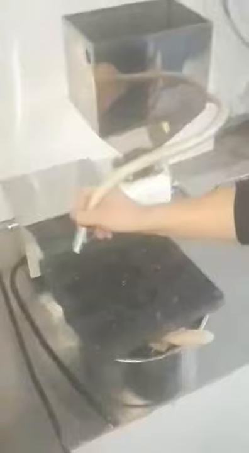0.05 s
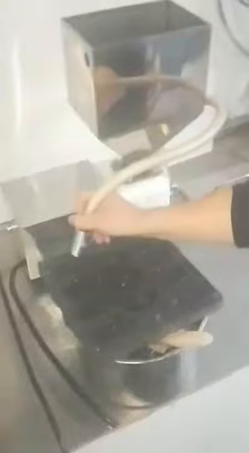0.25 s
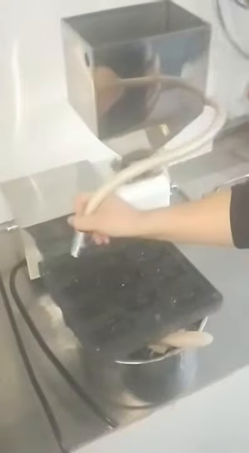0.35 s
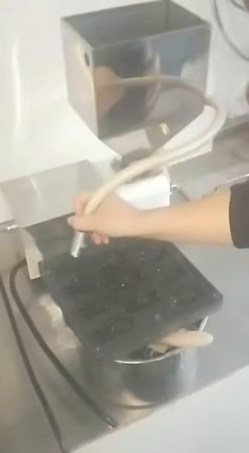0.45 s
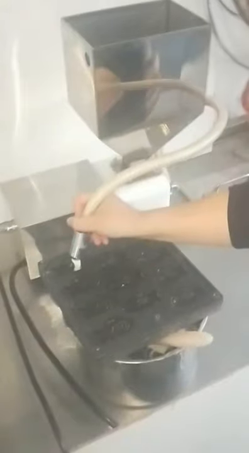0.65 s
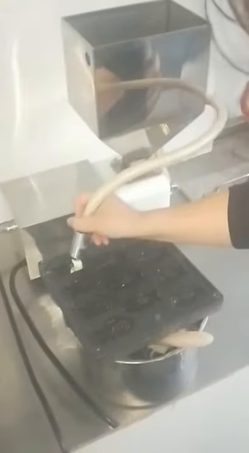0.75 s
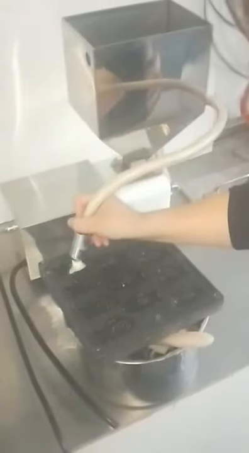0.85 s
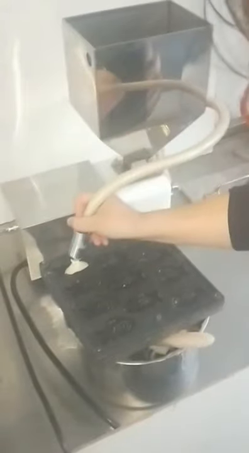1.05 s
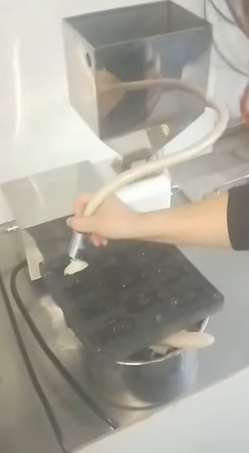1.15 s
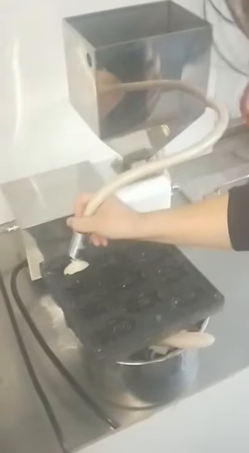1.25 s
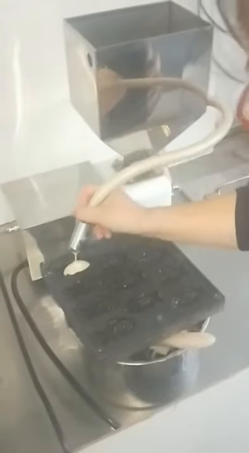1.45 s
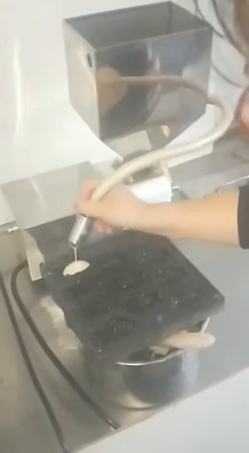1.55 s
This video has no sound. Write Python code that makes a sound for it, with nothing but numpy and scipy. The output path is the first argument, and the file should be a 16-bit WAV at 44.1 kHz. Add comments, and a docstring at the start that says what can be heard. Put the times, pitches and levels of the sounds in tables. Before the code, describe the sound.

A valve clunks and hisses as a filling machine dispenses batter in a workshop.

```python
"""Workshop noise fades in and a solenoid hums: a batter depositor doses one portion in a bakery.
A valve knocks open with a puff of air, each impact exciting damped modes of its body and metal parts.
The pump drones and batter hisses through the hose; then the valve clacks shut, and the steel hopper
and the hard-walled room ring out over the steady noise of other machines."""
import sys
import numpy as np
from scipy import signal
from scipy.fft import rfft, irfft
from scipy.io import wavfile
from scipy.ndimage import uniform_filter1d

SR = 44100
rng = np.random.default_rng(int(sys.argv[2]) if len(sys.argv) > 2 else 0)


def materialize(psi):
    """Save the field psi as 16-bit PCM at rate SR to the path in sys.argv[1].

    A 1-D psi becomes a single channel; in a 2-D psi each row is a channel.
    """
    bounded = np.clip(np.atleast_2d(psi).T, -1, 1)
    quanta = np.round(bounded * 32767).astype(np.int16)
    wavfile.write(sys.argv[1], SR, quanta)


N = 70560

# Metal contacts of the valve. Each row: start in seconds, level in dB, left minus right in dB,
# treble tilt in dB per octave.
CONTACTS = [(0.4469, -35, 4, -5.5), (0.4652, -46.5, -0.5, -5), (0.479, -44.5, -0.5, 0),
            (0.773, -49.5, 10, -8.5), (0.9453, -48.5, -1.5, 1.5), (0.9536, -22, -1.5, 0),
            (0.9638, -44.5, -8, 4.5), (0.9711, -36, 9, 10)]
# Spectrum of air puffs and contact cracks. Each row: frequency in Hz, relative density in dB.
AIR_SPECTRUM = [(600, -10), (1500, 0), (2400, 2), (3500, 3), (4200, -0.5), (5000, 2), (6000, 3.5),
                (6500, -1.5)]
# Spectrum of the machine's rumble. Each row: frequency in Hz, relative density in dB.
RUMBLE_SPECTRUM = [(30, 2), (60, -2), (130, -2), (330, -1), (520, -13), (900, -7), (1800, -7), (3000, -31)]
RUMBLE_TOP_HZ, HISS_TOP_HZ, CUTOFF_HZ = 2440, 6090, 6870
BUILD_UP_S = 0.0047   # rise of the room's tail and of the hopper's ring


def from_db(db):
    """Amplitude grows tenfold for every 20 dB."""
    return 10 ** (np.asarray(db) / 20)


def rms_one(x):
    """Normalisation to unit mean power."""
    return x / np.sqrt(np.mean(x ** 2) + 1e-20)


def seconds():
    """Uniform sampling: the time of every sample."""
    return np.arange(N) / SR


def level(rows):
    """Gain interpolated in decibels. Each row: time in seconds, level in dB."""
    return from_db(np.interp(seconds(), *np.transpose(rows)))


def at_hz(points, hz):
    """Interpolation of a table on a logarithmic frequency axis."""
    f, value = np.transpose(points)
    return np.interp(np.log(hz), np.log(f), value)


def swell(start, stop, attack, t60):
    """Linear attack, hold, then exponential decay of 60 dB in t60 seconds."""
    t = seconds()
    return np.clip((t - start) / attack, 0, 1) * from_db(-60 * np.maximum(t - stop, 0) / t60)


def panned(pan_db):
    """A level difference between left and right places a source."""
    return from_db(np.array([[.5], [-.5]]) * pan_db)


def drift(rate_hz):
    """Low-passed Gaussian noise: a slow random fluctuation of rms 1."""
    hz = np.fft.rfftfreq(N, 1 / SR)
    return rms_one(irfft(rfft(rng.standard_normal(N)) / (1 + (hz / rate_hz) ** 2), N))


def noise(colour, top_hz):
    """A diffuse field: coloured, partly correlated stereo noise of rms 1 with a steep upper edge."""
    # Likeness of the two sides. Each row: frequency in Hz, correlation coefficient.
    coherence = [(40, .85), (100, 1), (200, 0.93), (400, 0.75), (800, 0.26), (1500, -0.17), (3000, -0.051),
                 (6000, 0.81)]
    hz = np.fft.rfftfreq(N, 1 / SR) + 1
    mid, side = rfft(rng.standard_normal((2, N)))
    alike = np.clip(at_hz(coherence, hz), -1, 1)
    edge = 1 / np.sqrt(1 + (hz / top_hz) ** 60)
    both = np.sqrt(1 + alike) * mid + np.sqrt(1 - alike) * side * [[1], [-1]]
    return rms_one(irfft(both * edge * from_db(at_hz(colour, hz)), N))


def wavering(hz, depth, spread):
    """Random modulation of a tone's amplitude and phase; spread scatters the sides' phases in radians."""
    phase = 2 * np.pi * (hz * seconds() + rng.random()) + spread * rng.standard_normal((2, 1))
    in_phase = (1 + depth * drift(7.9)) * np.sin(phase)
    quadrature = depth * drift(31) * np.cos(phase)
    return np.sqrt(2 / (1 + 2 * depth ** 2)) * (in_phase + quadrature)


def lowpass(x, hz):
    """Zero-phase filtering keeps the part of a sound below a frequency."""
    return signal.sosfiltfilt(signal.butter(2, hz, fs=SR, output="sos"), x)


def ring(x, hz, t60):
    """A two-pole resonator: its impulse response is a damped sine of height 1."""
    r, w = np.exp(-np.log(1000) / (t60 * SR)), 2 * np.pi * hz / SR
    return signal.lfilter([0, np.sin(w)], [1, -2 * r * np.cos(w), r * r], x + 1e-18)


def strike(start, modes, rise, tilt_db=0):
    """Modal superposition: damped sines build up over the contact time, tilted about their mean pitch."""
    t = np.maximum(seconds() - start, 0)
    centre = np.mean([m[0] for m in modes])
    contact = np.sin(np.pi / 2 * np.minimum(t / rise, 1)) ** 2
    return contact * sum(from_db(db + tilt_db * np.log2(hz / centre) - 60 * t / t60)
                         * np.sin(2 * np.pi * hz * t) for hz, db, t60 in modes)


def room(x, delay_s=0.024, t60=0.77):
    """Reverberation: convolution with a decaying diffuse tail stands for the walls' reflections."""
    # Spectrum of the tail. Each row: frequency in Hz, relative density in dB.
    spectrum = [(100, -1.5), (1000, -2.5), (2000, -0.5), (2400, 3.5), (3200, -1.5), (3600, 0), (4200, -1.5),
                (5300, -4.5), (6000, -0.5), (6400, -15)]
    tail = noise(spectrum, HISS_TOP_HZ) * swell(delay_s, delay_s, BUILD_UP_S, t60)
    energy = np.mean(np.sum(tail ** 2, axis=1))
    tail = tail * np.sqrt(2 * HISS_TOP_HZ / SR / energy)   # about unit power gain within its band
    return signal.fftconvolve(x, tail, axes=1)[:, :N]


def workshop():
    """Broadband noise and faint whines of other machines superpose and fade in, thin and dull at first."""
    # Spectrum of the background. Each row: frequency in Hz, relative density in dB.
    spectrum = [(25, -11.5), (70, 1), (101, 1.5), (134, -2.5), (190, -1.5), (300, -4), (440, -6.5),
                (540, -7), (870, -5), (1160, -6.5), (1500, -11), (1750, -7.5), (2050, -12.5), (2400, -12.5)]
    # Machine whines. Each row: frequency in Hz, level in dB relative to the noise.
    whines = [(786, -20.5), (860, -21), (922, -17.5), (1140, -22), (1738, -19)]
    # Envelope of the background. Each row: time in seconds, level in dB.
    envelope = [(0.012, -105), (0.025, -71.5), (0.105, -64.5), (0.2, -60.5), (0.3, -55.5), (0.6, -60),
                (1.15, -54), (1.6, -56)]
    x = noise(spectrum, RUMBLE_TOP_HZ)
    x = x + sum(from_db(db) * wavering(hz, depth=0.95, spread=.8) for hz, db in whines)
    bass, low = lowpass(x, hz=129), lowpass(x, hz=870)
    bass_full_s, upper_full_s = .165, 0.4
    upper_gain = from_db(-13 * np.maximum(1 - seconds() / upper_full_s, 0))
    bass_gain = from_db(-16 * np.clip((bass_full_s - seconds()) / .03, 0, 1))
    return (bass_gain * bass + (low - bass) + upper_gain * (x - low)) * level(envelope)


def solenoid_hum(hum_hz=99.34):
    """Magnetic force pulses at twice the mains frequency, so the solenoid hums and shakes the casing."""
    # Envelope of the hum. Each row: time in seconds, level in dB.
    envelope = [(0.0, -100), (0.16, -84), (0.195, -59.5), (0.265, -51), (0.35, -54.5), (0.43, -61),
                (0.51, -71), (0.605, -49), (0.65, -51), (0.69, -55.5), (0.735, -50.5), (0.92, -44),
                (1.0, -47.5), (1.08, -54.5), (1.15, -58), (1.22, -66), (1.6, -76.5)]
    phase = 2 * np.pi * hum_hz * seconds() + 0.031 * np.array([[-1], [1]])
    tone = np.sqrt(2) * (np.sin(phase) + from_db(-19) * np.sin(3 * phase))
    shake = from_db(-17) * noise(RUMBLE_SPECTRUM, RUMBLE_TOP_HZ)
    return level(envelope) * (tone + shake)


def fitting_ticks():
    """Loose fittings tick faintly: noise bursts with a soft onset and exponential decay."""
    # Ticks. Each row: start in seconds, level in dB.
    ticks = [(0.333, -69), (0.415, -68), (1.432, -69)]
    # Spectrum of the fittings. Each row: frequency in Hz, relative density in dB.
    spectrum = [(2800, -22), (3300, -1), (3900, -21), (4700, 3), (5000, -2), (5400, -6.5), (5900, 1)]
    envelope = sum(from_db(db) * swell(s, s, attack=.02, t60=0.33) for s, db in ticks)
    return noise(spectrum, HISS_TOP_HZ) * envelope


def valve_knocks(left_lag_s=0.00026):
    """Impact excitation: the plunger hits the valve body and rebounds; the frame thuds on closing."""
    # Blows. Each row: start in seconds, level in dB, left minus right in dB, contact time in seconds.
    blows = [(0.343, -45.5, -2.5, 0.0018), (0.355, -52.5, -4.5, .002), (0.4446, -36.5, -2, .0028),
             (0.9462, -29, -3.5, 0.0015), (0.9597, -30, -7.5, 0.0028), (0.9745, -38, 4.5, 0.0014)]
    # Modes of valve body and frame. Each row: frequency in Hz, level in dB, 60 dB decay time in seconds.
    body_modes = [(807, -15, 0.06), (920, -3.5, 0.052), (994, -2, 0.061), (1155, -22.5, 0.046)]
    frame_modes = [(48, -47.5, 0.052), (156, -41, 0.092)]
    dry = 0
    for s, db, pan, rise in blows:
        modes = np.array([strike(s + lag, body_modes, rise) for lag in (left_lag_s, 0)])
        dry = dry + from_db(db) * panned(pan) * modes
    thud = strike(start=0.99, modes=frame_modes, rise=0.0068)
    return dry + from_db(-9.5) * room(dry) + thud


def pump(rumble_on_s=0.467, off_s=1, attack_s=0.017, t60=0.45):
    """Forced vibration: the running pump's wavering tones enter one by one over a low rumble."""
    # Tones of the pump. Each row: frequency in Hz, level in dB, start in seconds.
    partials = [(217.6, -63.5, 0.64), (300.1, -64, 0.434), (366.4, -64.5, 0.442), (431.5, -62.5, .57),
                (1785, -68, 0.46)]
    tones = sum(from_db(db) * wavering(hz, depth=0.53, spread=0.4) * swell(s, off_s, attack_s, t60)
                for hz, db, s in partials)
    rumble = from_db(-55) * noise(RUMBLE_SPECTRUM, RUMBLE_TOP_HZ)
    return tones + rumble * swell(rumble_on_s, off_s, attack_s, t60)


def valve_clacks(rise_s=0.00079, right_lag_s=.000012):
    """A brief contact has a broad spectrum: metal on metal gives a crack and excites bright modes."""
    # Modes of the metal. Each row: frequency in Hz, relative level in dB, 60 dB decay time in seconds.
    metal_modes = [(2365, -13, 0.027), (2795, -11, 0.018), (3510, -10.5, 0.015), (3720, -7.5, 0.014),
                   (4220, -14, 0.014), (4465, -27.5, 0.026), (5554, -8.5, 0.026), (5870, -10, 0.035),
                   (6430, -6.5, 0.023), (6606, -9.5, 0.032)]
    crack = from_db(-12) * noise(AIR_SPECTRUM, CUTOFF_HZ)
    dry = 0
    for s, db, pan, tilt in CONTACTS:
        modes = np.array([strike(s + lag, metal_modes, rise_s, tilt) for lag in (0, right_lag_s)])
        dry = dry + from_db(db) * panned(pan) * (modes + crack * swell(s, s, rise_s, t60=.014))
    return dry + from_db(-10) * room(dry)


def hopper_ring():
    """Lightly damped steel panels ring on and beat unevenly; the contacts' energies add."""
    # Modes of the hopper. Each row: frequency in Hz, level in dB relative to the contact.
    panel_modes = [(2293, -40), (2573, -35.5), (2923, -36.5), (3553, -34.5), (3700, -40.5), (4457, -32.5),
                   (5098, -47), (5297, -40), (5486, -41), (6002, -42.5)]
    energy = sum((from_db(db) * swell(s, s, BUILD_UP_S, t60=0.72)) ** 2 for s, db, _, _ in CONTACTS)
    return np.sqrt(energy) * sum(from_db(db) * wavering(hz, depth=1, spread=2.1) for hz, db in panel_modes)


def air_puffs(flutter_db=2.0):
    """Turbulent jet noise: short puffs of air leave the valve as it switches."""
    # Puffs. Each row: start in seconds, hold in seconds, level in dB.
    puffs = [(0.452, .034, -46.5), (0.963, 0.041, -50), (1.156, 0.028, -60.5)]
    envelope = sum(from_db(db) * swell(s, s + hold, attack=0.007, t60=0.094) for s, hold, db in puffs)
    dry = noise(AIR_SPECTRUM, HISS_TOP_HZ) * envelope * from_db(flutter_db * drift(90))
    return dry + from_db(-3.5) * room(dry)


def batter_flow(flutter_db=2.0):
    """Flow noise: the dose hisses through the hose, and a narrow resonance whistles at the nozzle."""
    # Spectrum of the hiss. Each row: frequency in Hz, relative density in dB.
    spectrum = [(800, -3), (1900, -2.5), (2500, 5), (3300, 5), (4000, -3), (5000, -4), (6000, -1.5),
                (6500, -12.5)]
    # Envelope of the hiss. Each row: time in seconds, level in dB.
    envelope = [(0.5, -95), (0.6, -78), (0.71, -65), (0.765, -64.5), (0.78, -61), (0.825, -52),
                (0.86, -56.5), (0.935, -62.5), (0.96, -89.5)]
    hiss = noise(spectrum, HISS_TOP_HZ)
    whistle = from_db(-59.5) * rms_one(ring(hiss, hz=3326, t60=0.066))
    whistle = whistle * swell(start=.753, stop=0.825, attack=.025, t60=0.25)
    return hiss * level(envelope) * from_db(flutter_db * drift(60)) + whistle


def suppress(x, size=512, slope=5.1, depth_db=-16.5):
    """Spectral gating: each narrow band is turned down while its power lies under a threshold."""
    # Threshold of the gate. Each row: frequency in Hz, level in dB per bin.
    threshold = [(1500, -125), (2200, -100), (3000, -94.5), (6000, -90), (6600, -81)]
    hz, _, spectra = signal.stft(x, SR, nperseg=size)
    power = np.mean(abs(spectra) ** 2, axis=0)
    power = uniform_filter1d(uniform_filter1d(power, size=3, axis=0), size=3, axis=1)
    over = (power / from_db(at_hz(threshold, hz[:, None] + 1)) ** 2) ** slope
    gain = np.maximum(over / (1 + over), from_db(depth_db))
    return signal.istft(spectra * gain, SR, nperseg=size)[1][:, :N]


def scene():
    """Linear superposition: the sound pressures of the machine and its workshop add."""
    impacts = valve_knocks() + valve_clacks() + hopper_ring() + fitting_ticks()
    return impacts + air_puffs() + batter_flow() + solenoid_hum() + pump() + workshop()


def record(dry):
    """Gating and band limiting: weak treble is lowered, the level dips, hiss is added, the top is cut."""
    dip_s, dip_half_s, dip_db = .9398, 0.0034, -33   # just before the valve shuts
    dip = from_db(dip_db * np.exp(-((seconds() - dip_s) / dip_half_s) ** 4))
    x = suppress(dry) * dip + from_db(-94) * rng.standard_normal((2, N))
    return signal.sosfilt(signal.ellip(7, .3, 50, CUTOFF_HZ, fs=SR, output="sos"), x)


dry = scene()
out = record(dry)
materialize(out)
```